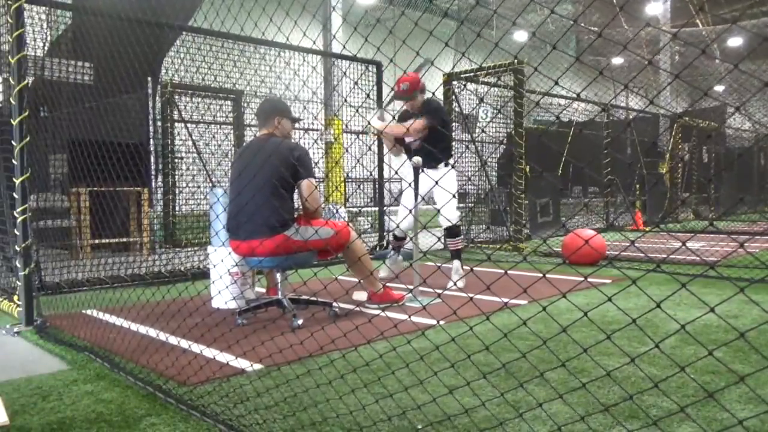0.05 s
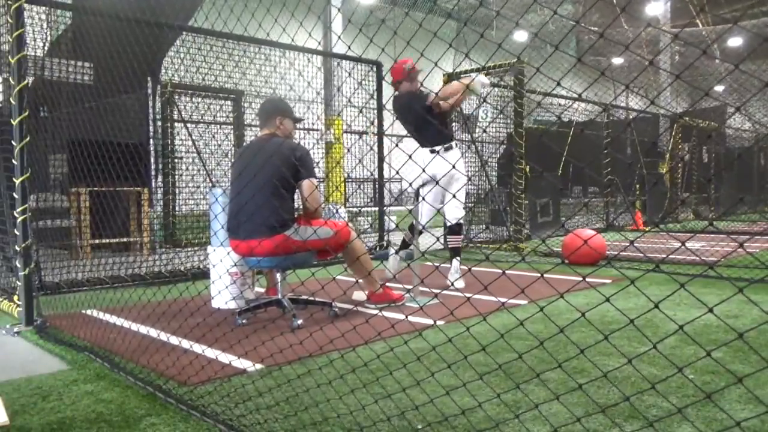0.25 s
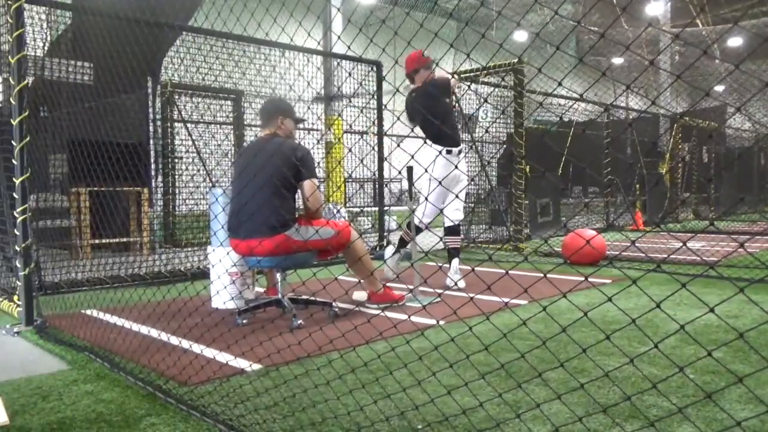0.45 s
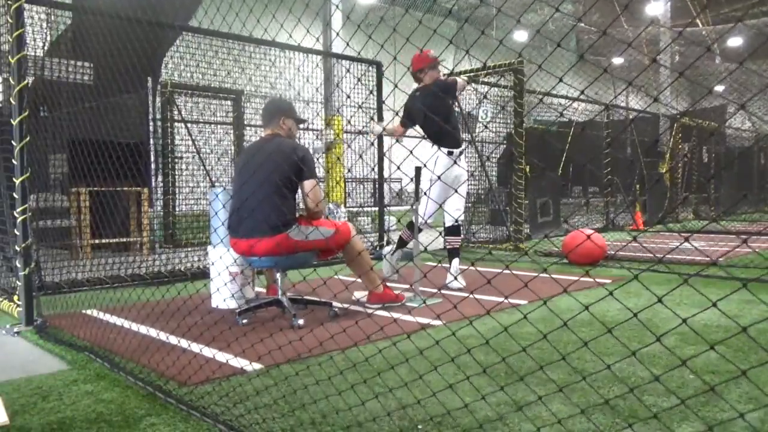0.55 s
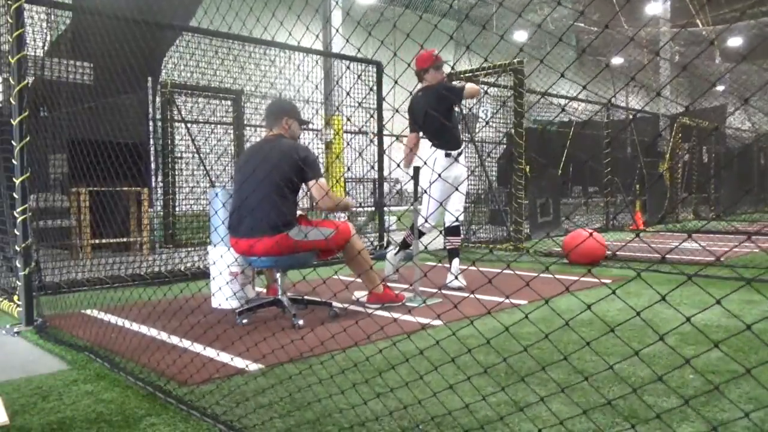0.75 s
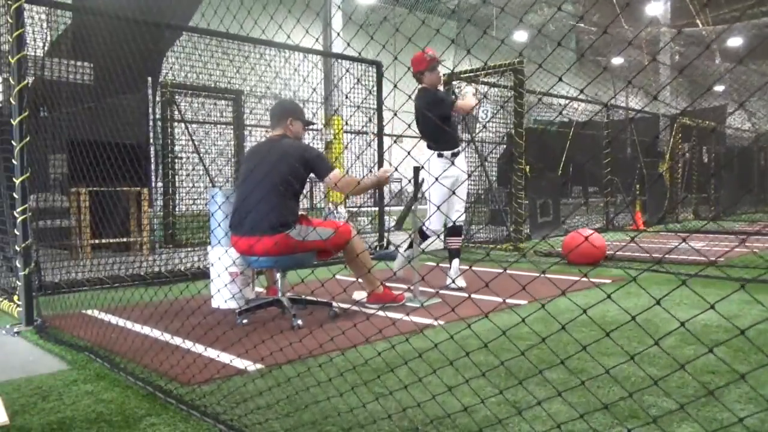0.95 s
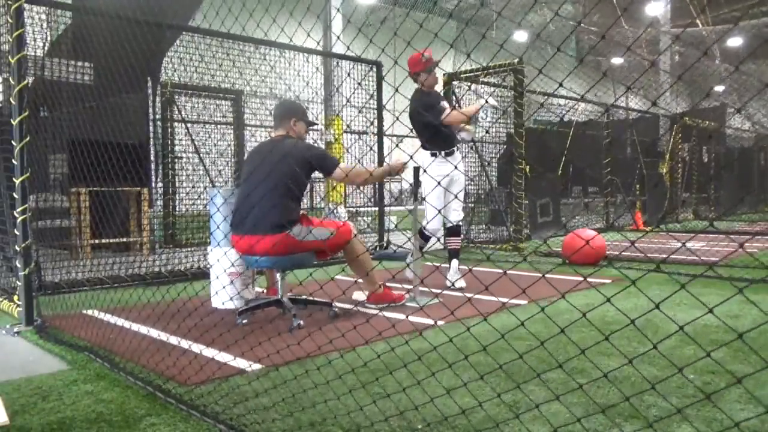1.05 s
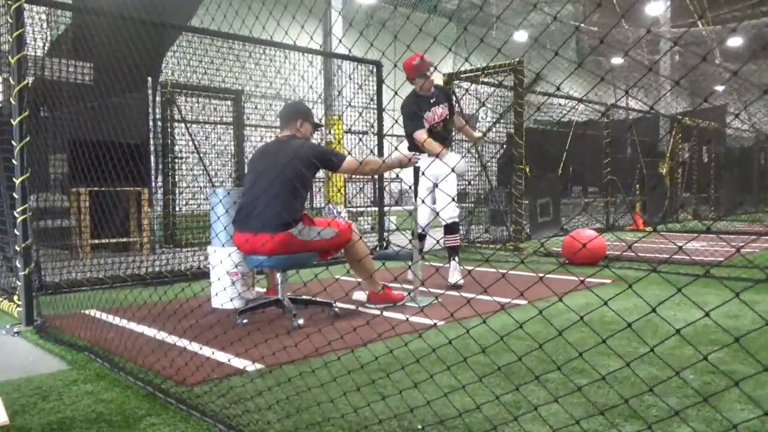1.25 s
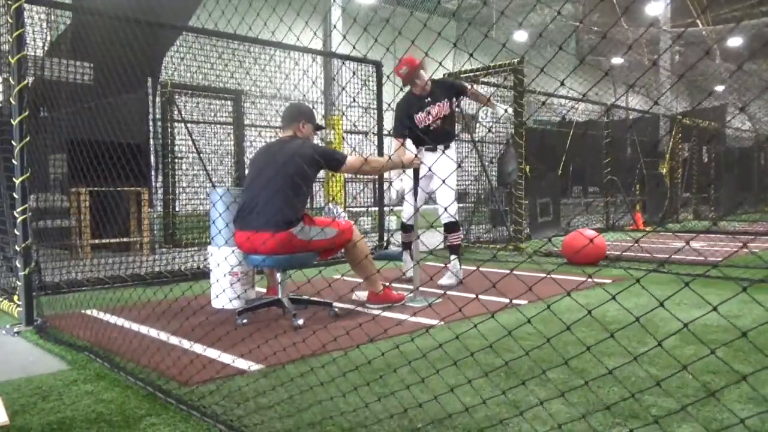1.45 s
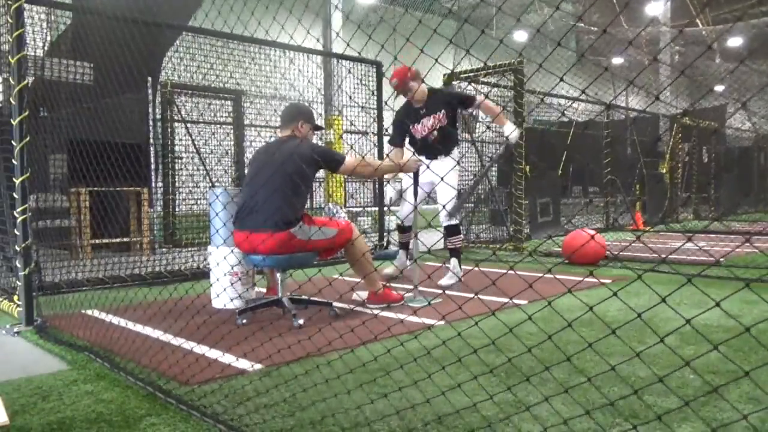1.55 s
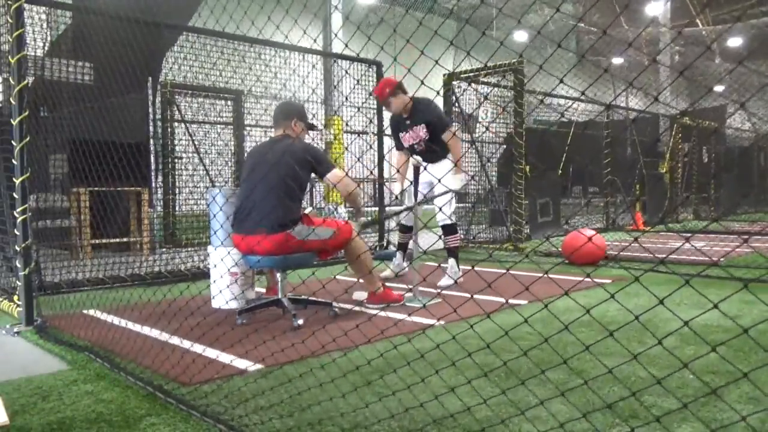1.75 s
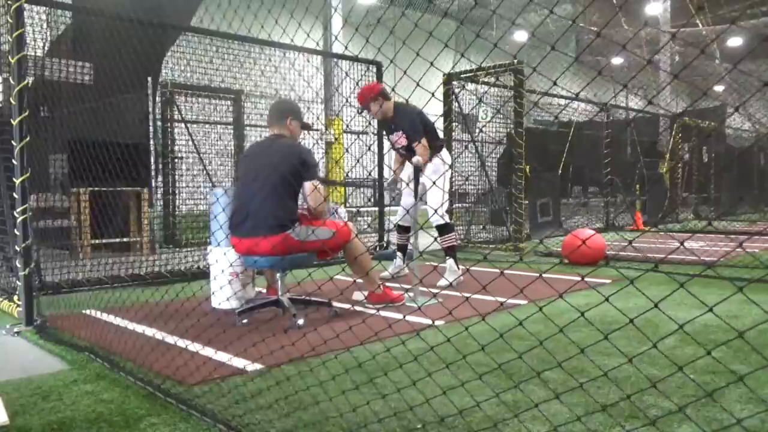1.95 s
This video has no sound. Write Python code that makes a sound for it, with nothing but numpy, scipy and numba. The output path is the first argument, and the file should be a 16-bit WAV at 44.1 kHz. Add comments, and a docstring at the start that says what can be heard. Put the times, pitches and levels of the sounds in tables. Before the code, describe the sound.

A bat cracks a baseball once, ringing through a large indoor batting hall.

```python
"""Ventilation hums in a large indoor batting hall; a batter rustles, strides and swings with a swish.
The bat cracks a ball off a tee: the impact excites brief modes, overloads the microphone and rings
round the hall as echoes and reverberation. A hollow knock follows, then the ball rattles the far net.
About a second after the crack comes a dull thud, with faint rustles before and after it."""
import sys
import numpy as np
from scipy import signal
from scipy.fft import rfft, irfft
from scipy.io import wavfile
from scipy.ndimage import uniform_filter1d
from numba import njit

SR = 44100
rng = np.random.default_rng(int(sys.argv[2]) if len(sys.argv) > 2 else 0)


def wav_record(signal):
    """Record a signal, one row per channel, as 16-bit PCM in the file named by sys.argv[1]."""
    frames = np.transpose(np.atleast_2d(signal))
    bounded = np.clip(frames, -1, 1)
    # unit amplitude maps onto the largest positive 16-bit level
    quanta = np.round(bounded * 32767).astype(np.int16)
    wavfile.write(sys.argv[1], SR, quanta)


N = 88200
HIT_S = 0.2456  # bat meets ball


def amp(db):
    """Decibels as an amplitude ratio."""
    return 10 ** (np.asarray(db) / 20)


def panned(level_db, pan_db):
    """Level-difference panning: left and right gains, the left pan_db above the right."""
    return amp(level_db + np.array([[pan_db], [-pan_db]]) / 2)


def since(start_s):
    """Seconds since a moment, zero before it."""
    return np.maximum(np.arange(N) / SR - start_s, 0)


def curve_at(points, hz):
    """Interpolation of a table along a log-frequency axis."""
    freqs, values = np.array(points).T
    return np.interp(np.log(hz + 1e-3), np.log(freqs), values)


def noise(spectrum, width_db=0):
    """Spectrally shaped stereo noise: a mid of unit RMS, and an independent side that gives width."""
    # side level relative to mid in the hall: freq_hz, side_db
    width = [(60, -52), (200, -21.5), (400, -12), (800, -8.5), (2400, -7.5), (5500, -6.5), (8500, -1.5)]
    hz = np.fft.rfftfreq(N, 1 / SR)
    mid_bins, side_bins = rfft(rng.standard_normal((2, N))) * amp(curve_at(spectrum, hz))
    mid = irfft(mid_bins, N)
    side = irfft(side_bins * amp(curve_at(width, hz) + width_db), N)
    return np.array([mid + side, mid - side]) / mid.std()


def fade(start_s, t60_s, build_s=1e-4):
    """Exponential build-up times exponential decay, which loses 60 dB in t60_s."""
    t = since(start_s)
    return (1 - np.exp(-t / build_s)) * np.exp(-np.log(1000) * t / t60_s)


def swell(peak_s, rise_s, fall_s):
    """A Gaussian envelope with separate rise and fall."""
    t = np.arange(N) / SR - peak_s
    return np.exp(-(t / np.where(t < 0, rise_s, fall_s)) ** 2)


def wander(rate_hz):
    """Random fluctuation: straight ramps between Gaussian values, with a spread near 1."""
    step = int(SR / rate_hz)
    held = np.repeat(rng.standard_normal(N // step + 1), step)
    return uniform_filter1d(held, step)[:N]


def ring(start_s, modes):
    """Free vibration: a sum of damped sinusoids struck at one moment."""
    t = since(start_s)
    return sum(amp(db) * np.sin(2 * np.pi * hz * t) * fade(start_s, t60) for hz, db, t60 in modes)


def pulse(centre_s, width_s):
    """A pressure pulse, compression then rarefaction: the derivative of a Gaussian."""
    u = (centre_s - np.arange(N) / SR) / width_s
    return u * np.exp((1 - u ** 2) / 2)


def butterworth(x, cutoff_hz, kind="low"):
    """A second-order filter, falling 12 dB an octave beyond its cutoff."""
    return signal.sosfilt(signal.butter(2, cutoff_hz, kind, fs=SR, output="sos"), x)


def ventilation():
    """Broadband flow noise plus fan and mains tones that waver in pitch and level."""
    # spectrum of rushing air: freq_hz, density_db
    airflow = [(15, -13), (28, 3), (45, 0.5), (70, 1), (110, -5), (200, -8.5), (350, -18), (800, -19.5),
               (2000, -25.5), (4000, -34.5), (7000, -36.5), (9800, -35), (12000, -39), (15500, -37)]
    # fan and mains tones: pitch_hz, level_db
    tones = [(60, -60.5), (88, -46), (119, -54.5), (171, -52.5), (240, -52), (479, -61), (599, -64),
             (720, -60.5)]
    drift_hz, waver_db = 1.58, 0.5
    out = noise(airflow) * amp(-40.5 + waver_db * wander(13.3))
    for hz, db in tones:
        cycles = np.cumsum(hz + drift_hz * wander(10.58)) / SR + rng.random()
        peak = np.sqrt(2) * amp(db - waver_db * wander(10.7))
        out = out + peak * np.sin(2 * np.pi * cycles)
    return out


def batter():
    """Friction noise of clothes and shoes, a low rumble in the stride, and the bat's aerodynamic swish."""
    # rustles of clothes and of shoes on turf: peak_s, level_db, rise_s, fall_s
    moves = [(.05, -47.5, 0.039, 0.052), (.17, -41.5, 0.071, 0.074), (1.175, -46.5, 0.017, 0.019),
             (1.552, -49.5, 0.023, 0.079), (1.979, -47, 0.0053, 0.0071)]
    # spectrum of the rustles: freq_hz, density_db
    friction = [(200, -27), (800, 7.5), (3500, 5), (6000, -1.5), (10000, 1), (15000, -8)]
    # spectrum of air flowing round the bat: freq_hz, density_db
    turbulence = [(40, -6), (90, 13.5), (250, 3), (500, -3.5), (1500, -9.5), (5000, -21), (10000, -16.5),
                  (15000, -36)]
    # spectrum of the rumble: freq_hz, density_db
    stride = [(20, -14), (45, -7), (75, -3), (130, -17), (400, -27.5), (3000, -59)]
    rustle = noise(friction) * sum(amp(db) * swell(s, rise, fall) for s, db, rise, fall in moves)
    swish = amp(-26) * noise(turbulence) * swell(HIT_S, rise_s=0.036, fall_s=0.0046)
    rumble = amp(-34) * noise(stride) * swell(0.1, rise_s=0.099, fall_s=0.099)
    return rustle + swish + rumble


def thud():
    """A soft impact, likely a ball dropping: pressure pulses, low modes and a two-slope reverberation."""
    # direct pulse and its nearest reflections: centre_s, level_db, width_s
    arrivals = [(1.3755, -14, .001), (1.3885, -30, .0008), (1.3966, -20.5, 0.0008),
                (1.4045, -18.5, 0.00054), (1.4105, -34, 0.0018)]
    # hollow resonances: pitch_hz, level_db, t60_s
    modes = [(153, -24, 0.21), (235, -34, .2), (325, -24, 0.19), (435, -32, 0.22), (560, -43, .12),
             (900, -25, 0.03)]
    # spectrum of the thud's reverberation: freq_hz, density_db
    room = [(50, -20), (130, 2), (450, -4.5), (650, -15), (1100, -13.5), (3000, -28), (8000, -51),
            (15000, -52.5)]
    start_s, _, width_s = arrivals[0]
    pulses = sum(amp(db) * pulse(s, width) for s, db, width in arrivals)
    body = ring(start_s - 2 * width_s, modes)
    return_s = start_s + 0.0089
    fast = amp(-23) * fade(return_s, t60_s=0.25, build_s=0.017)
    slow = amp(-38.5) * fade(return_s, t60_s=1.76, build_s=0.017)
    return butterworth(pulses, 88.7, "high") + body + (fast + slow) * noise(room)


def net():
    """The ball slaps and thumps the far net; its fittings ring and reverberation smears the rattle."""
    # impacts on net and fittings: start_s, level_db, t60_s
    hits = [(0.5491, -20.5, 0.035), (.5647, -28, 0.083), (0.583, -26.5, 0.061)]
    # spectrum of those impacts: freq_hz, density_db
    slap_spectrum = [(1000, -10), (3000, -1), (4800, 1), (6500, -4), (8000, 0), (11000, -3), (15000, -18)]
    # spectrum of the rattle's reverberation: freq_hz, density_db
    wash_spectrum = [(700, -4.5), (2500, 3.5), (5200, -3), (7000, -9), (10000, -14.5), (15000, -28)]
    # spectrum of the net's low thump: freq_hz, density_db
    thump_spectrum = [(25, -17), (70, 3), (140, -9), (300, -22), (1000, -42)]
    # resonances of the fittings: pitch_hz, level_db, t60_s
    fittings = [(5480, -34, .22), (5470, -33, 0.18), (7750, -35, .2)]
    first_s, last_s = hits[0][0], hits[-1][0]
    slaps = noise(slap_spectrum) * sum(amp(db) * fade(s, t60) for s, db, t60 in hits)
    wash = amp(-19) * noise(wash_spectrum) * fade(first_s, t60_s=0.58, build_s=0.032)
    thump = amp(-38) * noise(thump_spectrum) * fade(first_s, t60_s=0.55)
    return slaps + wash + thump + ring(last_s, fittings)


def knock():
    """Damped resonance just after the hit, likely from the tee."""
    # modes of the hollow knock: pitch_hz, level_db, t60_s
    modes = [(374, -23, 0.18), (448, -28, 0.155), (683, -20, 0.087)]
    return ring(0.2835, modes)


def diffuse_tail(start_s):
    """Frequency-dependent absorption: each band of the diffuse field decays, the treble fastest."""
    # spectrum of the diffuse field: freq_hz, density_db
    spectrum = [(120, -25), (300, -13.5), (520, -8.5), (760, -3), (1020, 2.5), (1280, -2), (1600, 2.5),
                (2400, 3), (3300, -2), (5200, -4), (7300, -14.5), (10300, -59), (15000, -49)]
    # reverberation time of the hall: freq_hz, t60_s
    decay_times = [(200, 2.4), (600, 2.82), (1200, 2.71), (2500, 2.1), (4000, 1.41), (7000, 1.16),
                   (10000, 0.55), (15000, .45)]
    hz = np.fft.rfftfreq(N, 1 / SR)
    field = rfft(noise(spectrum))
    centres_hz = np.geomspace(200, 16000, 16)
    tail = 0
    for centre, weights in zip(centres_hz, np.eye(len(centres_hz))):
        band = irfft(field * np.interp(hz, centres_hz, weights), N)
        tail = tail + band * fade(start_s, curve_at(decay_times, centre), build_s=0.02)
    return tail


def hall():
    """Reverberation: the crack scatters off the cage, then the walls and roof, and fills the hall."""
    # spectrum of scatter from cage and walls: freq_hz, density_db
    scatter = [(120, -7), (250, -2), (380, -7.5), (520, 2), (850, 11.5), (1300, 5.5), (2400, 6.5),
               (5000, -6), (8000, -6.5), (10000, -9.5), (15000, -29)]
    # spectrum of the wave back from roof and far walls: freq_hz, density_db
    far_return = [(200, -49), (550, -3.5), (800, 7), (1300, 4), (2400, 3.5), (3300, -3), (5200, -8.5),
                  (8000, -18.5), (15000, -64)]
    # pitches that hang in the hall: pitch_hz, level_db, t60_s
    resonances = [(601, -41.5, 4.1), (760, -27, 0.94), (782, -20, 1), (910, -34, 0.93), (1026, -15.5, 0.78),
                  (1102, -35, 1.8), (1530, -29.5, 2.5), (2317, -27, 1.94), (2346, -34, 1.7),
                  (2400, -27, 1.8), (2650, -26, 1.5)]
    start_s, resonance_build_s = HIT_S + 0.021, 0.026
    cage = amp(-15.5) * noise(scatter, width_db=-12) * fade(HIT_S, t60_s=0.15)
    walls = amp(-7) * noise(scatter) * fade(start_s, t60_s=0.47, build_s=0.029)
    tail = amp(-13.5) * diffuse_tail(start_s)
    far = panned(-8.5, pan_db=1.5) * noise(far_return) * fade(HIT_S + 0.071, t60_s=0.78, build_s=0.029)
    hanging = ring(start_s, resonances) * (1 - np.exp(-since(start_s) / resonance_build_s))
    clumps = amp(2.0 * wander(rate_hz=150))  # reflections arrive in clumps
    return clumps * (cage + walls + far) + hanging + tail


def echoes(direct):
    """Specular reflection: floor, walls and roof return copies, duller the later they come."""
    # reflection paths: delay_s, level_db, pan_db
    paths = [(.0046, -15, -3), (0.01, -21, -2), (0.0246, -5.5, 2), (0.0275, -10, -3), (.0358, -10, 5),
             (0.0389, -3.5, 8), (0.153, -7.5, -1), (0.2236, -17, 1)]
    top_hz, halving_s = 10100, 0.12  # treble limit, and the delay that halves it
    out = 0
    for delay_s, db, pan_db in paths:
        dulled = butterworth(direct, top_hz / (1 + delay_s / halving_s))
        out = out + np.roll(dulled, int(delay_s * SR), axis=1) * panned(db, pan_db)
    return out


def crack():
    """Impulsive excitation: the brief contact gives a broadband snap and sets bat and ball ringing."""
    # modes of bat and ball: pitch_hz, level_db, t60_s
    modes = [(956, 0, 0.031), (1020, -7.5, 0.028), (1580, -5.5, 0.016), (1810, -6, 0.028),
             (3074, -7, 0.024), (4220, -11, 0.018), (4830, -16.5, 0.02), (9550, -14, 0.022)]
    # spectrum of the contact: freq_hz, density_db
    contact = [(200, -20), (800, -9), (3000, -1), (6000, -2.5), (10000, -4), (15000, -16)]
    snap = amp(-2) * noise(contact, width_db=-2) * fade(HIT_S, t60_s=0.0075)
    return amp(-6) * ring(HIT_S, modes) + snap


def scene():
    """Superposition of all sources, a few metres from the batter."""
    direct = crack()
    return direct + echoes(direct) + knock() + hall() + net() + thud() + batter() + ventilation()


@njit
def follow(x, attack_s, release_s):
    """An envelope follower: one-pole smoothing with separate time constants for rise and fall."""
    out, level = np.empty(len(x)), 0.
    for i in range(len(x)):
        level += (x[i] - level) / (SR * (attack_s if x[i] > level else release_s))
        out[i] = level
    return out


def record(dry):
    """Gain control ducks after the crack, peaks saturate, and the treble is centred and band-limited."""
    threshold_db, slope = -11.5, 0.33
    roll_off_hz, mono_above_hz, top_hz = 13100, 6150, 15600
    level = follow(np.abs(dry).max(axis=0), attack_s=0.0039, release_s=1.0)
    gain = np.maximum(level / amp(threshold_db), 1) ** -slope
    left, right = np.tanh(dry * gain)
    mid = butterworth((left + right) / 2, roll_off_hz)
    side_filter = signal.butter(3, mono_above_hz, fs=SR, output="sos")
    side = signal.sosfiltfilt(side_filter, (left - right) / 2)
    steep_cut = signal.ellip(10, .2, 90, top_hz, fs=SR, output="sos")
    return signal.sosfilt(steep_cut, [mid + side, mid - side])


dry = scene()
out = record(dry)
wav_record(out)
```